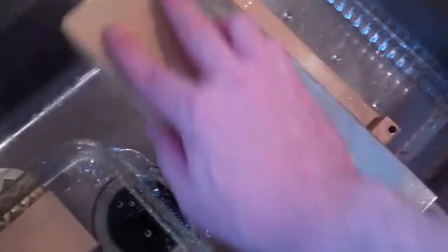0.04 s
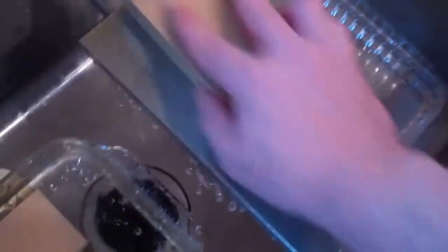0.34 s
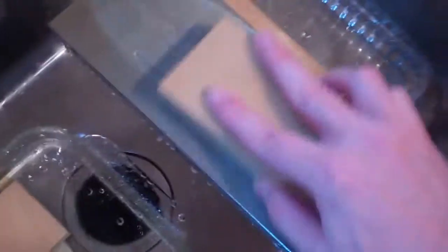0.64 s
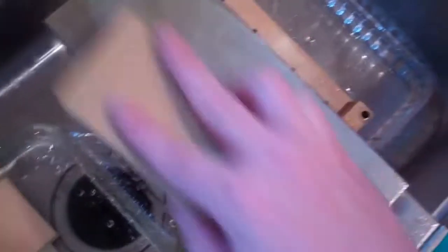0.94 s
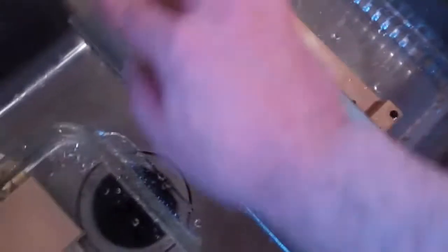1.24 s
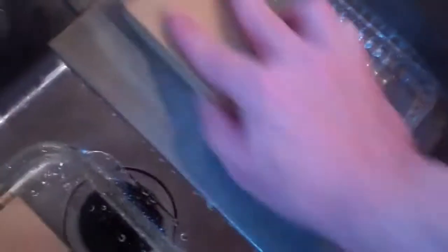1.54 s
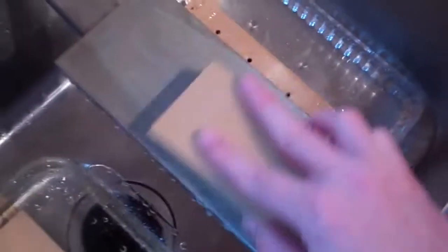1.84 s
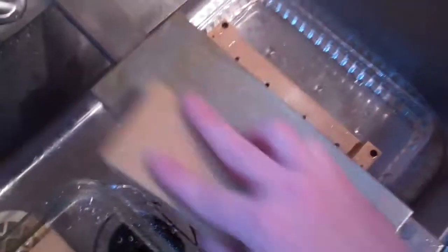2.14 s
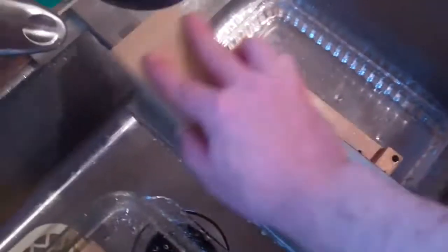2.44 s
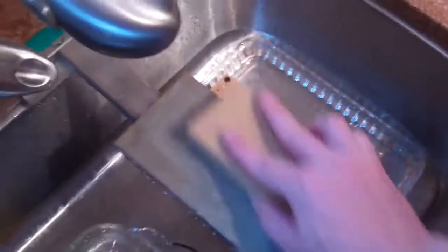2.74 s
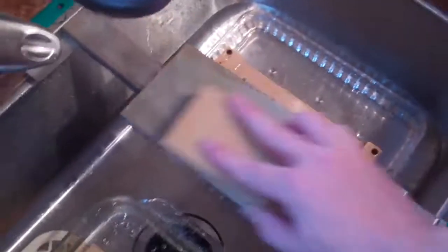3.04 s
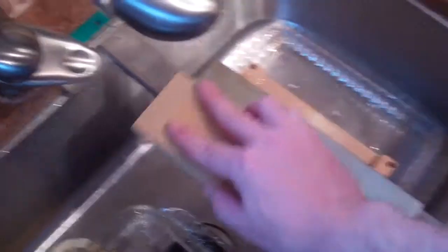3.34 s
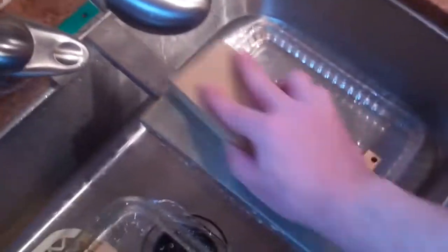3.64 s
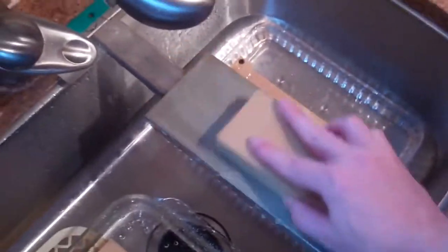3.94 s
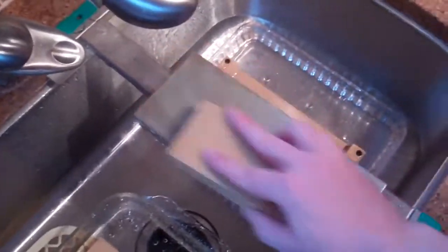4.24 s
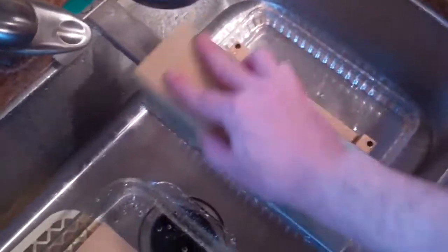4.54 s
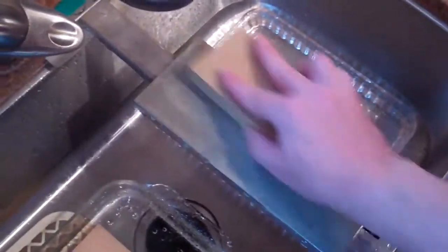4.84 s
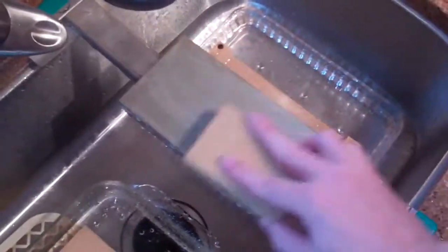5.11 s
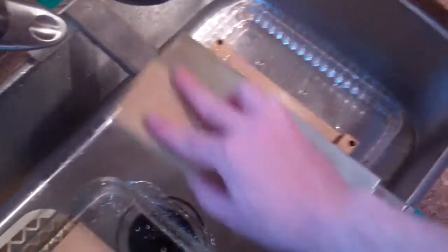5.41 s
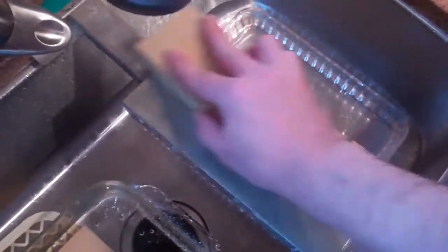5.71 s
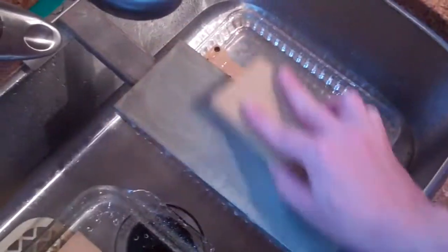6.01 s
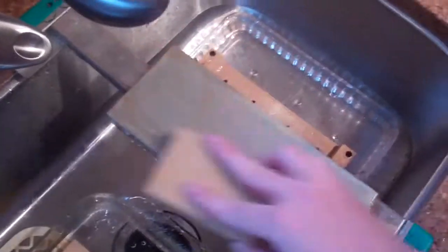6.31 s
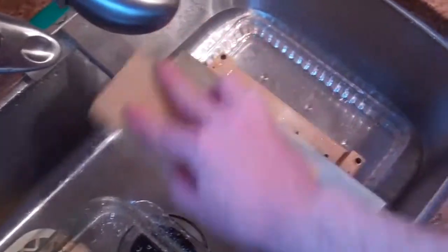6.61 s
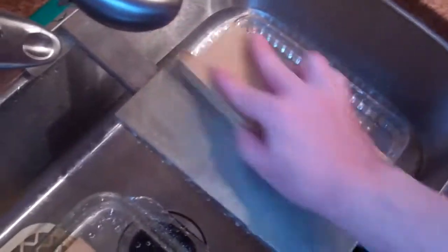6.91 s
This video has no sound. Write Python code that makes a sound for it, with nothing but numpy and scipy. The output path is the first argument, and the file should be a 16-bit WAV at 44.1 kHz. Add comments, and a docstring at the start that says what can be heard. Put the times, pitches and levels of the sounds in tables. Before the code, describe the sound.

Close up in a quiet kitchen, a wet stone grinds to and fro on a flat plate in a quick, even rhythm. Each stroke brings a bright, sandy rasp, dotted with short squeals and a few tiny cracks of grit. Underneath are the faint murmur of the steel sink, occasional soft dull bumps and a low hum. The rubbing continues throughout, turning slightly lighter near the end.

```python
"""At a steel kitchen sink, a small wet stone is lapped to and fro on an abrasive plate laid across it.
Countless grit impacts hiss and rasp with each stroke and excite the modes of stone and plate; the
plate's bending note slides as the load travels along it. The stone squeals and squeaks briefly, coarse
grains crack, and occasional dull bumps sound during the rubbing. The basin murmurs in forced vibration
underneath, with a few low groans and ringing notes, over a faint mains hum."""
import sys
import numpy as np
from scipy import signal
from scipy.fft import rfft, irfft, next_fast_len
from scipy.io import wavfile
from scipy.ndimage import uniform_filter1d, map_coordinates

SR = 44100
rng = np.random.default_rng(int(sys.argv[2]) if len(sys.argv) > 2 else 0)


def to_wav(s):
    """Save 16-bit WAV."""
    ch = np.atleast_2d(s).T  # columns
    pcm = np.round(np.clip(ch, -1, 1) * 32767)  # PCM
    wavfile.write(sys.argv[1], SR, pcm.astype(np.int16))


N = 311434

# The hand pushes the stone away. Each row: start and length in seconds, rise of the hiss in dB, share
# of the push at which it is fastest, bite in dB (negative if the hand eases), share at the bite's crest.
PUSH_STROKES = [(0.053, 0.402, 2.5, 0.7, 5.5, 0.78), (0.634, 0.267, 2, 0.69, 3.5, 0.36),
                (1.003, 0.296, 2.5, 0.88, 5.5, 0.36), (1.426, 0.27, 3.5, 0.72, 3.5, 0.35),
                (1.828, 0.285, 1.5, 0.65, 3, 0.36), (2.246, 0.292, 2.5, 0.68, 3.5, 0.39),
                (2.691, 0.302, 2.5, 0.67, 3.5, 0.19), (3.133, 0.288, 4, 0.74, 5, 0.13),
                (3.514, 0.3, 5, 0.82, 3.5, 0.27), (3.913, 0.324, 3.7, 0.7, 2.8, 0.36),
                (4.309, 0.33, 5, 0.55, 2.5, 0.34), (4.751, 0.285, 4, 0.56, 0.5, 0.23),
                (5.132, 0.319, 3.5, 0.81, 0.5, 0.15), (5.493, 0.356, 4, 0.64, 2, 0.2),
                (6.038, 0.175, 4, 0.74, -4.5, 0.6), (6.47, 0.185, 4.5, 0.66, -2.5, 0.53),
                (6.873, 0.246, 6, 0.6, -1.3, 0.4)]
# The hand draws it back. Each row: start and length in seconds, rise of the hiss in dB, bite in dB.
PULL_STROKES = [(-0.085, 0.15, 1.5, 1), (0.387, 0.186, 3.5, -3), (0.91, 0.28, 0.94, -0.5),
                (1.3, 0.12, 1, 0.5), (1.608, 0.21, 3, -0.7), (2.093, 0.16, -1.5, 4.5),
                (2.51, 0.13, -0.3, 5), (2.9, 0.2, 0.5, 1.5), (3.364, 0.2, 1.2, 2.3), (4.201, 0.16, 1.3, 2),
                (4.574, 0.12, 0.3, 3), (4.698, 0.101, 1.5, 3), (5.387, 0.17, 2, 3), (5.897, 0.15, 3.5, -1),
                (6.326, 0.155, 3, 2.5), (6.725, 0.193, 3.5, 2.5)]
# Spectrum of the grit impacts. Each row: frequency in Hz, relative level in dB.
GRIT_SPECTRUM = [(300, -49), (800, -18.5), (1150, -16), (1400, -10.5), (1800, -7), (2600, -2), (3800, -0.9),
                 (5000, -3.5), (6700, -2.5), (8300, 0.4), (9000, -1.5), (9700, -11), (11000, -14),
                 (13800, -31.5)]
# Natural modes of the stone. Each row: frequency in Hz, bandwidth in Hz, relative level in dB.
STONE_RESONANCES = [(3391, 28, -2.2), (4430, 45, -7), (6415, 60, -1.3), (7118, 55, -2.2), (10083, 22, -14)]


def amp(db):
    """Amplitude ratio of a level in decibels."""
    return 10 ** (np.asarray(db) / 20)


def unit(x):
    """Normalisation: the mean of the channels gets rms 1."""
    return x / np.sqrt(np.mean(np.atleast_2d(x).mean(0) ** 2) + 1e-20)


def along(points, hz):
    """Interpolation of (Hz, value) points on a logarithmic frequency axis."""
    f, values = np.transpose(points)
    return np.interp(np.log(hz + 1), np.log(f + 1), values)


def curve(points):
    """Linear interpolation of (seconds, value) points at every sample."""
    return np.interp(np.arange(N) / SR, *np.transpose(points))


def wobble(rate):
    """Smooth random modulation with rate knots a second."""
    return map_coordinates(rng.standard_normal(int(N * rate / SR) + 4), [np.arange(N) * rate / SR])


def hump(start, length, crest):
    """A smooth envelope from 0 to 1 and back, highest at the crest share of its length."""
    knots = start + length * np.array([0, np.clip(crest, .1, .9), 1])
    return np.sin(np.pi / 2 * np.interp(np.arange(N) / SR, knots, [0, 1, 0]))


def filtered(x, response):
    """Linear filtering: the spectrum of x times a complex frequency response."""
    size = next_fast_len(N + SR // 2)
    return irfft(rfft(x, size) * response(np.fft.rfftfreq(size, 1 / SR)), size)[..., :N]


def resonance(f, hz, width):
    """Response of a damped oscillator, 1 at its natural frequency."""
    return 1j * f * width / (hz * hz - f * f + 1j * f * width)


def colour(f, spectrum, modes):
    """Gain of a smooth spectrum with a peak or dip at each resonance."""
    modal_db = sum(db * abs(resonance(f, hz, width)) ** 2 for hz, width, db in modes)
    return amp(along(spectrum, f) + modal_db)


def ports(pair):
    """Partial coherence: two signals mix into left and right ports, the treble mostly to the left."""
    # Likeness of the two sides. Each row: frequency in Hz, coherence from 0 to 1.
    coherence = [(60, 0.5), (200, 0.82), (1200, 0.88), (2000, 0.78), (4000, 0.6), (5200, 0.38), (7800, 0.6),
                 (9500, 0.11), (13000, .2)]
    # Level difference. Each row: frequency in Hz, left minus right in dB.
    balance = [(60, 2.5), (2000, 3.5), (3800, 5), (6500, 7.5), (8000, 12), (9000, 18), (9700, 12.5),
               (11000, 5), (13000, 0)]
    # Phase difference. Each row: frequency in Hz, lead of the left in radians.
    phase_lead = [(100, 0.5), (3000, 0.33), (5500, 0.7), (8200, 1), (10200, -2), (13000, -2)]

    def paths(f):
        angle = np.arccos(np.clip(along(coherence, f), -1, 1)) / 2
        lean = amp(along(balance, f) / 2) * np.exp(.5j * along(phase_lead, f))
        mix = np.array([[np.cos(angle) * lean, np.sin(angle) * lean],
                        [np.cos(angle) / lean, -np.sin(angle) / lean]])
        return mix / np.linalg.norm(mix.mean(0), axis=0)
    return filtered(pair, paths).sum(1)


def noise():
    """White noise, partly coherent between left and right."""
    return ports(rng.standard_normal((2, N)))


def contacts(speed, per_second, spread_db):
    """Shot noise: tiny grit impacts of scattered size, their rate proportional to speed."""
    chance = np.clip(per_second * speed / SR, 1e-3, 1)
    sizes = amp(spread_db * rng.standard_normal(N)) * (rng.random(N) < chance) / np.sqrt(chance)
    return ports(sizes * rng.standard_normal((2, N)))


def patchy(x, depth_db, size):
    """Random gain patches in time and frequency; a larger window makes them narrower and longer."""
    spectra = signal.stft(x, nperseg=size)[2]
    field = uniform_filter1d(rng.standard_normal(spectra.shape[1:]), size=2, axis=0)
    field = uniform_filter1d(field, size=6, axis=1)
    return signal.istft(spectra * amp(depth_db * field / field.std()), nperseg=size)[1][:, :N]


def strokes(rest_db=-39.5, fade_db_per_s=0.3022, hiss_sharpness=1.5, bite_sharpness=3.2):
    """Sliding friction: speed sets the hiss (dB), pressure the bite (dB) and the plate's load (0-1)."""
    hiss = rest_db - fade_db_per_s * np.arange(N) / SR  # the stone creeps even through the turns
    bite, load = np.zeros(N), np.zeros(N)
    for start, length, hiss_db, fastest, bite_db, hardest in PUSH_STROKES:
        hiss += hiss_db * hump(start, length, fastest) ** hiss_sharpness
        bite += bite_db * hump(start, length, hardest) ** bite_sharpness
        load += hump(start, length, crest=0.386) ** 2
    for start, length, hiss_db, bite_db in PULL_STROKES:
        swell = hump(start, length, crest=.5)
        hiss += hiss_db * swell ** hiss_sharpness
        bite += bite_db * swell ** bite_sharpness
    return hiss, bite, load


def scrape(hiss, bite, gain_db=1.32, rest_bite_db=-1.52, unsteady_db=1.14):
    """Source and filter: grit impacts sound through the plate, and pressure lifts the middle band."""
    # Broad resonances of the plate. Each row: frequency in Hz, bandwidth in Hz, lift in dB.
    plate_modes = [(1960, 130, -1), (2124, 55, 5), (2620, 180, 1), (3070, 190, 1.5), (4110, 180, 2.5),
                   (4426, 110, 3), (4630, 140, 3.5), (5640, 120, 2), (6000, 70, 2), (8840, 105, -3.5)]
    # Where pressure adds bite. Each row: frequency in Hz, dB gained per dB of pressure.
    bite_slope = [(600, -1), (1150, 1.5), (1700, 0.5), (2150, 0.2), (2600, 0.78), (3100, 0.8), (3700, 0.86),
                  (4500, -0.22), (5500, 0), (9000, 0.05)]
    # The last strokes are quick and light. Each row: time in seconds, lightness from 0 to 1.
    lightness = [(5.6, 0), (6.15, 0.5)]
    # How light strokes thin the rubbing. Each row: frequency in Hz, gain in dB at lightness 1.
    light_colour = [(1000, -2.5), (1900, -3), (2700, 1), (3700, 1.5), (4200, 2), (4650, -1.5), (5200, 0),
                    (9000, 0.5), (11000, 1)]
    grit = contacts(amp(hiss - hiss.mean()), per_second=26000, spread_db=-0.5)
    grit = patchy(grit, depth_db=2.55, size=1536)  # the moving contact wakes ever different modes
    grit = unit(filtered(grit, lambda f: colour(f, GRIT_SPECTRUM, plate_modes)))
    hz, times, spectra = signal.stft(grit, SR, nperseg=512)
    pressure_db = np.interp(times * SR, np.arange(N), bite + rest_bite_db + unsteady_db * wobble(30))
    light = np.interp(times, *np.transpose(lightness))
    shade_db = np.outer(along(bite_slope, hz), pressure_db) + np.outer(along(light_colour, hz), light)
    grit = signal.istft(spectra * amp(shade_db), nperseg=512)[1][:, :N]
    judder_db = 0.53 * wobble(45)  # the stone grips and slides unevenly
    return amp(hiss + gain_db + judder_db) * grit


def plate_bend(hiss, load, unloaded_hz=1485, drift_hz_per_s=4, sag_hz=124.65, damp_db=6.5, width_hz=190):
    """Loading lowers and damps the plate's bending mode, a rough band of noise, at each push."""
    # Slow course of the note. Each row: time in seconds, base level in dB.
    bend_level = [(0.18, -49), (0.45, -54.5), (0.9, -54.5), (1.3, -54.5), (1.8, -53.5), (2.6, -53),
                  (3.2, -57), (4.2, -61.5), (4.7, -62), (5.2, -62), (5.9, -57), (6.15, -60), (6.8, -58.5)]
    t = np.arange(N) / SR
    # The stone lingers at the far end just after each push.
    far_end = sum(np.exp(-((t - start - length - 0.01) / .06) ** 2) for start, length, *_ in PUSH_STROKES)
    pulling = sum(hump(start, length, crest=.5) for start, length, *_ in PULL_STROKES)
    pitch_hz = unloaded_hz + drift_hz_per_s * t - sag_hz * load + 29.95 * far_end + 10 * wobble(12)
    level_db = curve(bend_level) - damp_db * load - 1.5 * far_end + 1.5 * pulling
    level_db += 0.23 * (hiss - hiss.mean()) + 1.5 * wobble(8.7) + 2.0 * wobble(70)
    swing = filtered(rng.standard_normal((2, 2, N)), lambda f: 1 / (1 + (2 * f / width_hz) ** 2))
    phase = 2 * np.pi * np.cumsum(pitch_hz) / SR
    note = ports(swing[0] * np.cos(phase) + swing[1] * np.sin(phase))
    notched = filtered(note, lambda f: amp(-5 * abs(resonance(f, hz=1497, width=35)) ** 2))
    return amp(level_db) * unit(notched)


def stone_ring(hiss, gain_db=-12.0, follow=0.98):
    """Resonance: friction feeds each of the stone's modes by fits and starts, even through the turns."""
    drive, ringing = noise(), 0
    for hz, width, db in STONE_RESONANCES:
        fits_db = 1.7 * wobble(18)
        mode = unit(filtered(drive, lambda f: resonance(f, hz, width)))
        ringing += amp(db + fits_db) * mode
    return amp(hiss.mean() + follow * (hiss - hiss.mean()) + gain_db) * ringing


def plate_ring(held_hz=1458, width_hz=55, held_gain_db=-1.6, turn_gain_db=-1):
    """Narrow resonances of the plate: one note holds under the stone, a higher one swells at turns."""
    # The held note. Each row: time in seconds, relative level in dB.
    held_level = [(0.1, -54), (0.8, -59), (1.4, -59), (2.0, -56), (2.2, -54), (2.45, -52), (2.65, -61.5),
                  (3.0, -60), (3.2, -54.5), (3.7, -52), (3.88, -59), (4.02, -53.5), (4.45, -54),
                  (4.62, -65), (4.78, -55), (5.2, -59.5), (5.98, -55.5), (6.15, -67), (6.8, -59),
                  (7.05, -62)]
    # Free ringing as the stone turns round. Each row: centre in seconds, frequency in Hz,
    # relative level in dB, half-length in seconds.
    turn_notes = [(0.072, 1534, -53, .07), (0.22, 1555, -47.5, .04), (0.55, 1583, -49.5, .05),
                  (0.958, 1534, -53, 0.043), (1.39, 1533, -53.5, .07), (1.765, 1604, -52, .04),
                  (2.12, 1510, -55, 0.081), (2.568, 1572, -51, 0.042), (3.02, 1580, -49, .09),
                  (3.355, 1540, -51, 0.11), (3.81, 1597, -50, 0.08), (4.226, 1570, -52, .06),
                  (4.63, 1575, -51.5, 0.045), (5.03, 1553, -53.5, .06), (5.417, 1560, -52.5, 0.056),
                  (5.843, 1560, -52.5, 0.053), (6.24, 1576, -54.5, 0.075), (6.603, 1554, -51, 0.046),
                  (6.808, 1530, -50, 0.044), (7.043, 1526, -49.5, .04)]
    t = np.arange(N) / SR

    def note(hz):
        """Phase diffusion: a random walk broadens a tone to the width of the mode."""
        stray = np.cumsum(rng.standard_normal(N)) * np.sqrt(np.pi * width_hz / SR)
        return np.sqrt(2) * np.sin(2 * np.pi * hz * t + uniform_filter1d(stray, size=256))

    ringing = amp(curve(held_level) + held_gain_db) * note(held_hz)
    for centre, hz, db, half_length in turn_notes:
        swell = np.exp(-((t - centre) / half_length) ** 2)
        ringing += amp(db + turn_gain_db) * swell * note(hz)
    flutter = unit(amp(2.8 * wobble(60)))
    return ports(np.array([ringing * flutter, np.zeros(N)]))


def sink(bite, gain_db=2, follow=0.19):
    """Forced vibration: the basin murmurs with the rubbing, more when the hand presses."""
    # Vibration passed down into the sink. Each row: time in seconds, relative level in dB.
    transmitted = [(0, -66), (0.48, -63.5), (0.78, -68.5), (0.93, -58), (1.02, -68.5), (1.12, -65.5),
                   (1.4, -75), (1.57, -66.5), (1.72, -74), (1.9, -70), (2.01, -65.5), (2.58, -61.5),
                   (2.68, -69), (2.9, -66), (3.12, -74), (3.3, -66), (3.6, -69.5), (3.9, -65), (4.05, -66),
                   (4.32, -65), (4.5, -69), (5.15, -71.5), (5.75, -70), (5.98, -63), (6.15, -70),
                   (6.7, -72), (7.05, -67)]
    # Broad spectrum of the basin. Each row: frequency in Hz, relative level in dB.
    basin_spectrum = [(120, -25), (220, -4.5), (300, -2), (700, 1), (1050, -4), (1600, -3), (3000, -41)]
    # Modes of the basin. Each row: frequency in Hz, bandwidth in Hz, lift in dB.
    basin_modes = [(315, 85, 10.5), (390, 24, 4.5), (480, 30, 8), (554, 58, 7), (746, 81, 4),
                   (902, 23, 11.5), (1066, 32, 6.5)]
    rubbing = patchy(noise(), depth_db=2.5, size=2048)
    murmur = unit(filtered(rubbing, lambda f: colour(f, basin_spectrum, basin_modes)))
    return amp(curve(transmitted) + gain_db + follow * bite) * murmur


def mains_hum(beat_crest_s=.17, waver_db=0.1):
    """Beating: a motor runs just under the mains rate, so its second harmonic beats with the buzz."""
    # Two motor harmonics and the mains buzz. Each row: frequency in Hz, level in dB.
    hum_partials = [(59.21, -69.5), (118.42, -78), (119.9, -78)]
    t = np.arange(N) / SR - beat_crest_s
    return sum(np.sqrt(2) * amp(db + waver_db * wobble(0.85)) * np.sin(2 * np.pi * hz * t)
               for hz, db in hum_partials)


def room_tone(level_db=-69.5):
    """Stationary noise: the quiet kitchen's background, strongest in the bass."""
    # Spectrum of the background. Each row: frequency in Hz, relative level in dB.
    room_spectrum = [(20, -3), (45, -7), (90, -2), (200, -5), (600, -8.5), (4000, -27.5)]
    return amp(level_db) * unit(filtered(noise(), lambda f: amp(along(room_spectrum, f))))


def brief_tones(flutter_db=2.5):
    """Single-mode vibration: high squeals of the stone, a few low groans and ringing notes of the sink."""
    # Each row: centre in seconds, frequency in Hz, level in dB before flutter, half-length in seconds.
    tone_events = [(0.091, 3391, -38.5, 0.031), (0.132, 3375, -37.5, 0.027), (0.194, 6410, -45, 0.031),
                   (0.29, 3391, -52, .14), (0.503, 3390, -37, 0.023), (0.52, 7060, -49, .04),
                   (0.57, 3365, -46, 0.066), (0.759, 4410, -50, 0.084), (1.732, 4425, -49, 0.055),
                   (0.58, 314, -68, 0.19), (0.633, 6330, -51, 0.082), (0.781, 3410, -45, .06),
                   (0.78, 7120, -47, .04), (0.928, 552, -63, .05), (0.94, 7120, -53, .04),
                   (0.955, 3391, -43.5, 0.046), (1.047, 6500, -51, .05), (1.172, 316, -72, 0.35),
                   (1.367, 7120, -47, .04), (1.733, 3410, -50, 0.045), (1.75, 7120, -47, .05),
                   (1.98, 7120, -49, .04), (1.99, 3370, -53, .04), (2.08, 6410, -44, 0.036),
                   (2.12, 3391, -47, 0.081), (2.35, 10083, -59, .2), (2.41, 3400, -44, 0.085),
                   (2.578, 7120, -49, .06), (2.591, 308, -59, 0.044), (2.77, 7120, -45, 0.033),
                   (2.848, 10083, -54.5, .26), (2.857, 7120, -47, .04), (2.965, 3391, -43, 0.034),
                   (3.36, 7120, -47, 0.055), (3.415, 3355, -45, 0.054), (3.71, 7120, -46, .04),
                   (3.734, 764, -56, 0.03), (4.165, 6440, -42, .07), (4.25, 3395, -50, 0.12),
                   (4.48, 3390, -55, .08), (4.56, 6460, -43, .085), (4.68, 3390, -51.5, .12),
                   (4.905, 3400, -44, 0.054), (5.298, 3350, -47, 0.047), (5.462, 3380, -46.5, 0.1),
                   (5.47, 7040, -50, .04), (5.713, 3382, -43, 0.035), (5.888, 3391, -49, .04),
                   (6.253, 3370, -47, 0.026), (6.56, 3391, -50, .07), (6.581, 6400, -47, .04),
                   (6.7, 3376, -44, 0.1), (6.77, 7120, -53, .08), (6.818, 4620, -44, .05),
                   (6.825, 3410, -45, 0.055), (7.0, 4150, -46, 0.056), (7.03, 4570, -46, .04),
                   (7.031, 6400, -46, .07)]
    tones = np.zeros(N)
    waver = .35 * wobble(40)  # radians
    flutter = amp(flutter_db * wobble(150))
    for centre, hz, db, half_length in tone_events:
        first = max(0, int((centre - half_length) * SR))
        span = np.arange(first, min(N, int((centre + half_length) * SR)))
        offset = span / SR - centre
        swell = np.cos(np.pi / 2 * offset / half_length) ** 2
        tones[span] += np.sqrt(2) * amp(db) * swell * np.sin(2 * np.pi * hz * offset + waver[span])
    return ports(np.array([tones * flutter, np.zeros(N)]))


def grabs():
    """Random excitation: the pressed stone grabs and drives coarse grains into one plate mode."""
    # Gritty squeaks. Each row: centre in seconds, frequency in Hz, bandwidth of each filter pass in Hz,
    # level in dB, half-length in seconds.
    grab_events = [(0.22, 2160, 200, -48, .05), (0.258, 4420, 400, -41.5, .035),
                   (0.3, 2610, 220, -44.5, 0.042), (0.743, 2620, 240, -49, 0.055),
                   (1.558, 2680, 260, -47, 0.041), (2.804, 2750, 260, -52, .05),
                   (3.2, 2680, 240, -45.5, .04), (3.61, 2870, 300, -43, .035),
                   (4.058, 3000, 260, -47.5, .05), (4.463, 2900, 300, -42, .06),
                   (4.85, 2940, 260, -45, 0.042), (5.273, 2980, 260, -47.5, .05),
                   (5.636, 2960, 260, -47, 0.054), (5.99, 2130, 220, -48, .04),
                   (6.155, 4200, 110, -46, .025), (6.41, 4630, 130, -45, .03),
                   (6.59, 4550, 200, -48, 0.034), (6.815, 4580, 120, -45, 0.038),
                   (6.83, 3950, 300, -43.5, .03), (6.915, 2890, 450, -50, .1)]
    t, squeaks = np.arange(N) / SR, 0
    grains = contacts(np.ones(N), per_second=6000, spread_db=1)
    for centre, hz, width, db, half_length in grab_events:
        b, a = signal.iirpeak(hz, hz / width, fs=SR)
        squeak = unit(signal.lfilter(b, a, signal.lfilter(b, a, grains)))
        squeaks += amp(db) * np.exp(-((t - centre) / half_length) ** 2) * squeak
    return squeaks


def snags(decay_s=0.0032, gain_db=-7, ring_gain=3):
    """Impulsive excitation: a coarse grain catches, cracks and briefly rings the stone."""
    # Cracking grains. Each row: start in seconds, relative peak level in dB.
    grain_cracks = [(0.4336, -28), (0.503, -18), (0.516, -19.5), (1.727, -29), (1.7538, -24), (4.4374, -29),
                    (4.4994, -31), (4.743, -30)]
    t, envelope = np.arange(N) / SR, np.zeros(N)
    for start, db in grain_cracks:
        envelope += amp(db + gain_db) * (t >= start) * np.exp(-abs(t - start) / decay_s)

    def response(f):
        modes = sum(amp(db) * resonance(f, hz, width) for hz, width, db in STONE_RESONANCES)
        return amp(along(GRIT_SPECTRUM, f)) * (1 + ring_gain * modes)
    return filtered(envelope * noise(), response)


def bumps(rise_s=0.012, gain_db=-3):
    """Damped oscillation: occasional dull, low bumps sound during the rubbing."""
    # Each row: time of the peak in seconds, relative level in dB, frequency in Hz.
    dull_bumps = [(0.513, -55, 152), (3.289, -59, 83.4), (4.209, -71, 63.45), (4.929, -64, 72.3),
                  (5.259, -56, 64.1), (5.68, -59, 72.6), (6.079, -56, 66), (6.449, -59, 68)]
    t, thuds = np.arange(N) / SR, np.zeros(N)
    for peak, db, hz in dull_bumps:
        age = np.maximum(t - peak + rise_s, 0)
        envelope = age / rise_s * np.exp(1 - age / rise_s)
        thuds += amp(db + gain_db) * envelope * np.sin(2 * np.pi * hz * age)
    return thuds


def scene():
    """Superposition: stone, plate and sink sound close by, over the quiet kitchen."""
    hiss, bite, load = strokes()
    room = room_tone()
    bass = (bumps() + mains_hum()) * amp([[1.2], [-1.2]])  # a little to the left
    rubbing = scrape(hiss, bite) + grabs() + plate_bend(hiss, load) + stone_ring(hiss)
    return rubbing + plate_ring() + brief_tones() + snags() + sink(bite) + bass + room


def record(dry):
    """Band limiting: an ideal low-pass filter removes the highest treble."""
    cutoff_hz = 14169
    return filtered(dry, lambda f: f < cutoff_hz)


dry = scene()
out = record(dry)
to_wav(out)
```